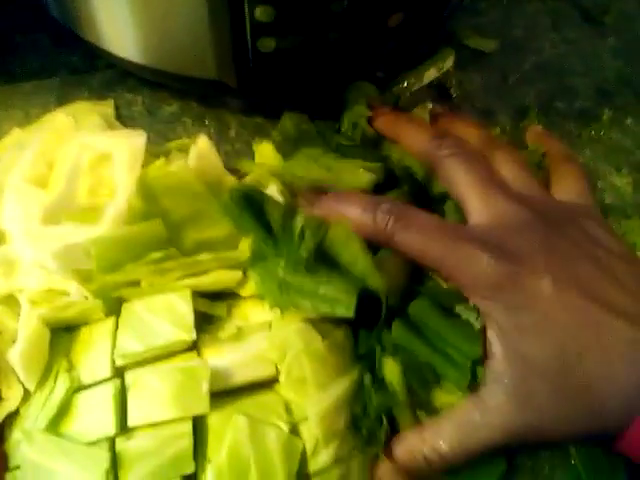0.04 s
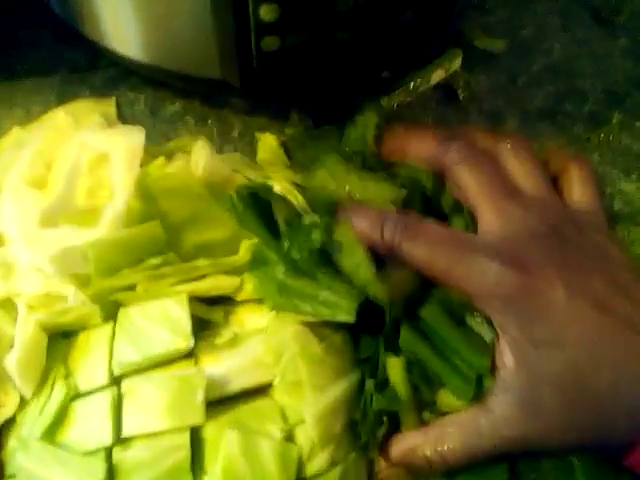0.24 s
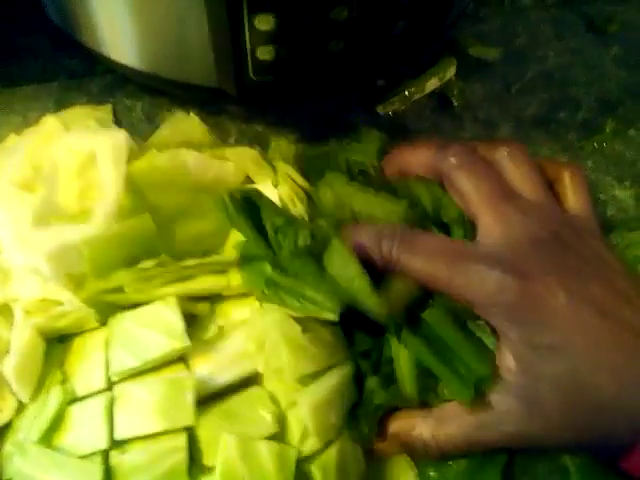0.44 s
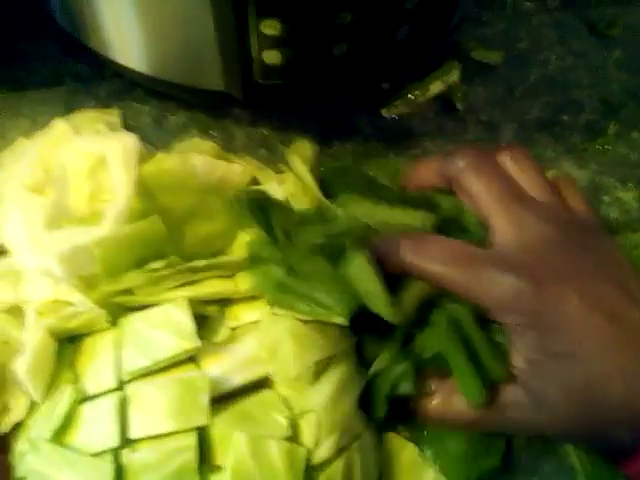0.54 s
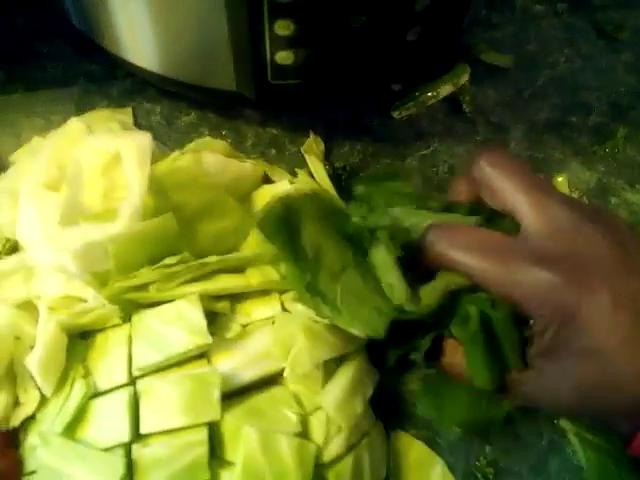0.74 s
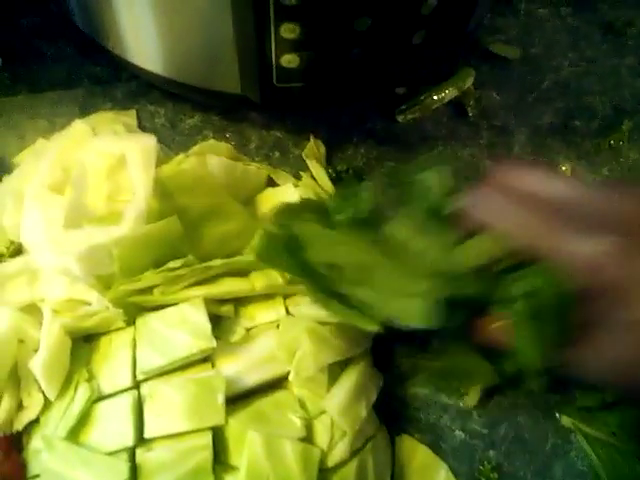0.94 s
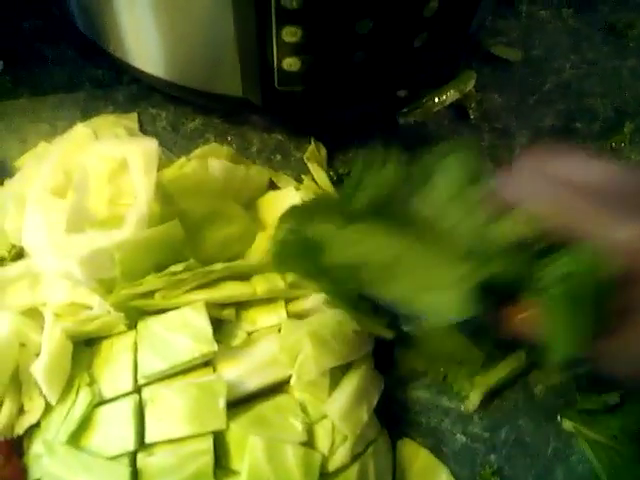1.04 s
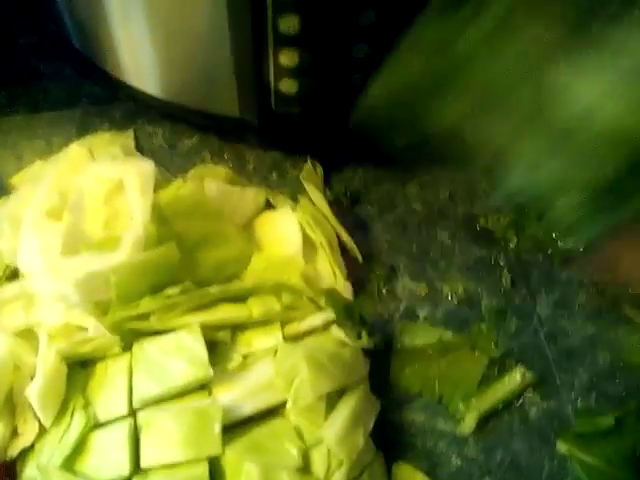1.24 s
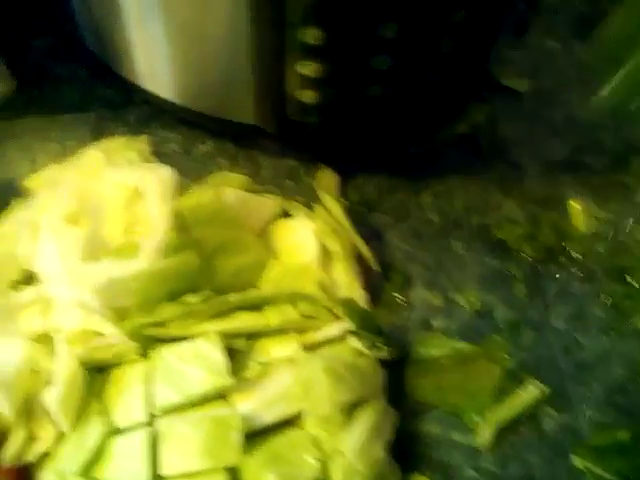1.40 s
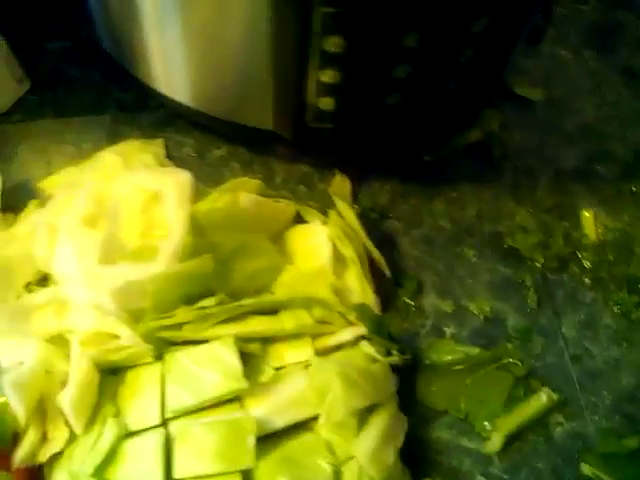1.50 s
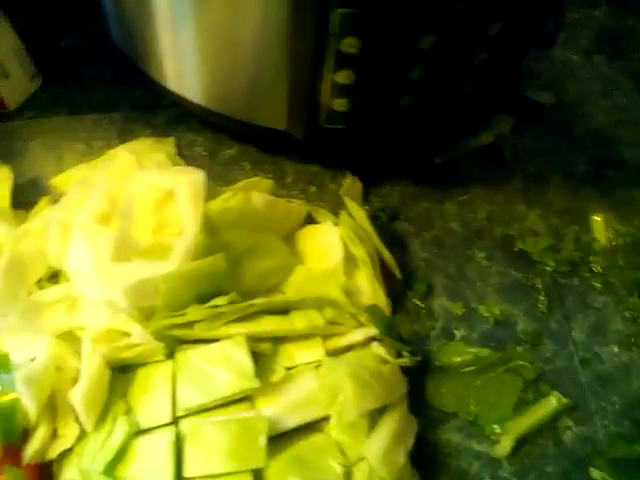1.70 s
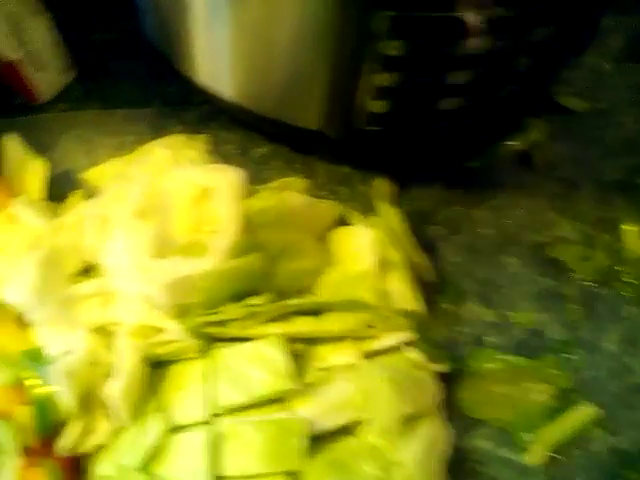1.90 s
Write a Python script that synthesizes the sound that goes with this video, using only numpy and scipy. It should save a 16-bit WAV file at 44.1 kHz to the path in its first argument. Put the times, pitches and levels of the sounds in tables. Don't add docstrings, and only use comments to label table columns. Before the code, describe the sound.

Chopped leafy greens rustle and crunch as a hand gathers and drags them across a worktop

```python
import sys
import numpy as np
from scipy import signal
from scipy.fft import rfft, irfft, next_fast_len
from scipy.io import wavfile
from scipy.ndimage import uniform_filter1d, map_coordinates

SR = 44100
rng = np.random.default_rng(int(sys.argv[2]) if len(sys.argv) > 2 else 0)


def field_ratio(decibels):
    return 10 ** (np.asarray(decibels, dtype=float) / 20)


def file_out(sig):
    cols = np.atleast_2d(sig).T
    lim = np.clip(cols, -1, 1)
    pcm = np.round(lim * 32767).astype(np.int16)
    wavfile.write(sys.argv[1], SR, pcm)


N = 85995


def unit(x):
    return x / np.sqrt(np.mean(x ** 2) + 1e-20)


def along(points, hz):
    f, v = np.transpose(points)
    return np.interp(np.log(hz + 1), np.log(f + 1), v)


def wobble(rate):
    knots = rng.standard_normal(int(N * rate / SR) + 4)
    return map_coordinates(knots, [np.arange(N) * rate / SR])


def filtered(x, response):
    m = next_fast_len(len(x) + 8192)
    return irfft(rfft(x, m) * response(np.fft.rfftfreq(m, 1 / SR)), m)[:len(x)]


def peak(f, hz, width_hz):
    return 1j * f * width_hz / (hz * hz - f * f + 1j * f * width_hz)


def place(out, start_s, sound):
    out[round(start_s * SR):][:len(sound)] += sound


def effort(column):
    # (time [s], rustle level [dB], pressure level [dB])
    hand = [(0, -53, -64.5), (0.059, -56, -63), (0.17, -58, -60.5), (0.185, -50, -63.5),
            (0.259, -50.5, -52), (0.311, -50, -67.5), (0.357, -55, -60), (0.411, -47, -47.5),
            (0.469, -53, -62.5), (0.561, -46, -46.5), (.595, -49, -50.5), (0.667, -45, -62),
            (0.711, -50.5, -50), (.75, -44, -53), (0.899, -41.5, -50.5), (1.05, -40.5, -53),
            (1.192, -43, -53.5), (1.24, -60, -60.5)]
    quiet_db = -61.5
    rows = np.transpose(hand)
    power = field_ratio(np.interp(np.arange(N) / SR, rows[0], rows[column])) ** 2
    return np.sqrt(np.clip(power - field_ratio(quiet_db) ** 2, 0, None))


def grains(count, mid_hz, spread, cycles, scatter_db):
    u, z, t = rng.random((count, 2)), rng.standard_normal(count), np.arange(160) / SR
    hz = np.clip(mid_hz * np.exp(spread * z), 900, 7500)[:, None]
    size_db = -scatter_db * np.log(np.maximum(u[:, 1:], .03))
    rows = field_ratio(size_db) * np.exp(-t * hz / cycles) * np.sin(2 * np.pi * hz * t)
    at = (u[:, :1] * N).astype(int) + np.arange(len(t))
    track = np.bincount(at.ravel(), rows.ravel())[:N]
    return unit(filtered(track, lambda f: f * f / (f * f + 600 ** 2)))


def leaves():
    # (frequency [Hz], density [dB per Hz])
    leaf_color = [(300, -14), (700, -12), (1400, -7), (3200, -7), (6500, -7), (8400, -14.5)]
    rustle_db, grains_db = -.5, -5.5
    z = signal.stft(rng.standard_normal(N), nperseg=256)[2]
    patches = uniform_filter1d(uniform_filter1d(rng.standard_normal(z.shape), 6, 0), 5, 1)
    hiss = signal.istft(z * field_ratio(2.5 * unit(patches)), nperseg=256)[1][:N]
    hiss = unit(filtered(hiss, lambda f: field_ratio(along(leaf_color, f)) * (f > 250)))
    crackle = grains(count=5000, mid_hz=4200, spread=.45, cycles=2.5, scatter_db=3.5)
    clumps = field_ratio(0.34 * wobble(32) + 1.6 * wobble(90))
    return effort(column=1) * clumps * (field_ratio(rustle_db) * hiss + field_ratio(grains_db) * crackle)


def drag():
    # (start time [s], length [s], level [dB], pitch [Hz])
    jerks = [(0.604, 0.028, -50.5, 982), (0.629, .065, -47, 1072), (0.635, 0.075, -53, 490),
             (.95, .06, -55, 499.3), (0.642, 0.028, -49, 888), (0.677, 0.019, -47.5, 858),
             (0.719, 0.03, -46.5, 1101), (0.722, 0.015, -47, 1329), (0.773, 0.018, -45, 1044),
             (0.788, 0.0077, -50.5, 1043), (0.825, 0.025, -49.5, 938), (0.867, 0.032, -51.5, 1082),
             (0.914, .01, -48, 1014), (0.933, 0.038, -46, 1005), (0.979, .026, -43.5, 1010),
             (1.016, 0.012, -41.5, 1013), (1.04, 0.014, -41.5, 1013), (1.069, 0.0099, -43, 1031),
             (1.103, .03, -53.5, 949), (1.105, 0.047, -43, 2217), (1.14, 0.013, -43.5, 933),
             (1.181, 0.01, -48.5, 1028)]
    # (multiple of pitch, width over pitch, level [dB])
    hollow_modes = [(1, 0.13, 0.5), (2.15, 0.065, -5), (3.15, 0.1, -7), (4.4, 0.095, -7)]
    drag_db, press_db = 1.5, -6
    slips_db, sing_db = -5, -1.5
    out, t = np.zeros(N + SR), np.arange(SR // 5) / SR

    def hollow(f, hz):
        modes = enumerate(hollow_modes)
        return sum((-1) ** k * field_ratio(db) * peak(f, m * hz, w * hz) for k, (m, w, db) in modes)

    for start, length, db, hz in jerks:
        shape = (1 - np.exp(-t / 0.0014)) * field_ratio(-60 * np.clip(t - length, 0, None) / 0.034)
        slips = rng.standard_normal(len(t)) * field_ratio(4.4 * rng.standard_normal(len(t)))
        steady_rms = filtered(slips, lambda f: hollow(f, hz)).std()
        scrape = filtered(slips * shape, lambda f: hollow(f, hz)) / steady_rms
        drift = .06 * np.cumsum(rng.standard_normal(len(t)))
        sing = field_ratio(sing_db) * shape * np.sin(2 * np.pi * hz * t + drift)
        place(out, start, field_ratio(db + drag_db) * (field_ratio(slips_db) * scrape + sing))
    uneven = field_ratio(3.6 * wobble(25)) * rng.standard_normal(N)
    rumble = unit(filtered(uneven, lambda f: peak(f, 260, 260) ** 2))
    return out[:N] + field_ratio(press_db) * effort(column=2) * rumble


def crunches():
    # (time [s], peak level [dB], pitch [Hz], decay t60 [s])
    crunch_events = [(.182, -43, 5500, 0.14), (.199, -41, 4480, 0.14), (0.284, -37, 5370, 0.22),
                     (0.303, -33.5, 1480, 0.12), (0.315, -39.5, 4280, 0.075), (0.37, -37.5, 3930, 0.051),
                     (0.393, -33, 4610, 0.11), (.404, -38.5, 5680, 0.068), (0.485, -26, 2980, 0.04),
                     (0.487, -25.5, 5220, 0.099), (0.525, -31.5, 1556, 0.078), (0.532, -33.5, 4760, 0.18),
                     (.547, -25, 6120, 0.18), (0.601, -35, 3860, 0.059), (0.621, -38, 4940, 0.048),
                     (.65, -25.5, 5430, 0.032), (0.661, -27.5, 5390, 0.06), (0.681, -35, 5450, 0.14),
                     (0.721, -24, 5710, 0.13), (0.73, -26, 6500, 0.13), (.815, -32, 3770, 0.12),
                     (0.833, -31, 4930, 0.093), (0.864, -27, 1787, 0.04), (0.88, -34.5, 4600, 0.044),
                     (0.918, -24, 3130, .06), (0.945, -25.5, 3094, 0.089), (0.96, -28.5, 4430, 0.08),
                     (0.983, -17, 6400, 0.027), (1.0, -37.5, 4480, 0.063), (1.021, -32.5, 3940, .04),
                     (1.042, -25, 3194, .07), (1.05, -27.5, 6460, .05), (1.073, -24, 5360, 0.037),
                     (1.101, -30.5, 3250, 0.14), (1.124, -27, 4030, 0.079), (1.141, -29, 4380, 0.086),
                     (1.19, -29, 3240, 0.07), (1.225, -42, 4520, .2), (1.26, -45, 5520, .15),
                     (1.283, -45, 5490, .1), (1.548, -47.5, 3630, .08)]
    snap_db = 0.5
    out, t = np.zeros(N + SR), np.arange(SR // 5) / SR
    for start, db, hz, t60 in crunch_events:
        sparse = rng.random(len(t)) < .15
        ticks = rng.standard_normal(len(t)) * sparse * field_ratio(1.3 * wobble(300)[:len(t)])
        ticks = unit(ticks) * field_ratio(-60 * t / max(t60, .005)) * (1 - np.exp(-t / .0004))
        burst = filtered(ticks, lambda f: peak(f, hz, 0.11 * hz) + field_ratio(-8.0) * peak(f, 3000, 6100) ** 2)
        place(out, start, field_ratio(db + snap_db) * burst / np.abs(burst).max())
    return out[:N]


def cracks():
    # (time [s], peak level [dB], pitch [Hz], width over pitch)
    stalks = [(0.2, -34.5, 5720, 0.47), (.2855, -36.5, 5500, 0.35), (0.3024, -40, 1430, 0.51),
              (0.305, -40.5, 5500, .4), (.318, -36.5, 3050, 0.59), (0.368, -35, 1470, 0.87),
              (.37, -38, 6160, 0.37), (0.378, -39, 4630, 0.42), (0.3953, -30, 1870, 1.4),
              (0.3962, -30.5, 5440, .6), (0.4045, -32, 5290, 0.51), (0.404, -38, 2800, 0.23),
              (.465, -45.5, 6020, 0.24), (0.4845, -28, 3000, 1), (0.51, -39, 2680, 0.56),
              (0.528, -32, 1560, 0.54), (0.5461, -17.5, 6000, 0.47), (.548, -18, 6410, 0.42),
              (.554, -25, 6320, 0.38), (0.563, -36.5, 6370, 0.077), (0.577, -28, 5220, 0.18),
              (.603, -34, 2290, 0.55), (.623, -31.5, 4660, 0.098), (.651, -32, 5650, 0.34),
              (0.662, -23.5, 2120, 2.3), (.684, -37, 5380, 0.22), (0.7294, -18.5, 6340, 0.2),
              (0.7366, -27, 6290, .3)]
    # (time [s], peak level [dB], pitch [Hz], width over pitch)
    scraps = [(1.266, -50, 3550, .3), (1.277, -47.5, 2970, 0.53), (1.2884, -40.5, 6100, 0.26),
              (1.286, -40.5, 1810, 0.19), (1.333, -52, 5880, 0.37), (1.3545, -43, 5860, 0.38),
              (1.357, -54.5, 5900, .3), (1.367, -42.5, 3530, .5), (1.376, -49.5, 3560, 0.2),
              (1.538, -52, 4140, 0.29), (1.549, -44.5, 3090, 0.61), (1.551, -50, 4510, 0.27),
              (1.558, -56, 2970, .2)]
    # (time [s], peak level [dB], pitch [Hz])
    ribs = [(0.78, -37.5, 2740), (0.7948, -35, 2760.0), (0.8098, -38, 6120.0), (0.8166, -33.5, 5080.0),
            (0.8233, -34.5, 3950), (0.8344, -29.0, 4740.0), (0.846, -30.5, 4740.0), (0.8514, -36, 5280),
            (0.867, -32, 2840.0), (0.8816, -31.0, 4650.0), (0.9161, -32.5, 5340.0), (0.9358, -29, 3010.0),
            (0.9449, -19.5, 4740.0), (0.9488, -25, 2334), (0.9643, -29.5, 4220.0), (0.9719, -30, 4820.0),
            (0.9852, -29.5, 6290.0), (0.9893, -25, 6030.0), (1.004, -34.5, 5080.0), (1.0204, -30.5, 4650.0),
            (1.0253, -35.5, 2150.0), (1.0438, -27, 4700), (1.0481, -24.5, 3190.0), (1.0559, -29.0, 4570.0),
            (1.074, -28, 5570), (1.0779, -30, 4680), (1.1073, -33.5, 3170), (1.1118, -32.0, 4520),
            (1.1262, -28, 1570), (1.13, -34, 2150.0), (1.1425, -31, 4760), (1.147, -31, 3520),
            (1.1533, -32, 3140), (1.1673, -31.5, 5170.0), (1.189, -28.0, 4740.0), (1.193, -30, 3110)]
    rib_db, rib_width = 2, .3
    crack_db, broad_db = 1.5, -9
    out, t = np.zeros(N + SR), np.arange(SR // 5) / SR
    rib_cracks = [(start, db + rib_db, hz, rib_width) for start, db, hz in ribs]
    for start, db, hz, width in list(stalks) + list(scraps) + rib_cracks:
        kick = rng.standard_normal(len(t)) * field_ratio(-60 * t / .009)
        crack = filtered(kick, lambda f: peak(f, hz, width * hz) ** 2 + field_ratio(broad_db) * peak(f, 3200, 5600))
        place(out, start, field_ratio(db + crack_db) * crack / np.abs(crack).max())
    return out[:N]


def bumps():
    # (time [s], peak level [dB])
    taps = [
        (0.368, -53.5),
        (0.394, -42),
        (0.54, -41),
        (0.728, -41),
        (0.961, -48.5),
    ]
    bump_db = -6.5
    out, t = np.zeros(N + SR), np.arange(SR // 5) / SR
    tones = np.sin(2 * np.pi * 205 * t) + 1.1 * np.sin(2 * np.pi * 310 * t)
    for start, db in taps:
        place(out, start, field_ratio(db + bump_db - 60 * t / 0.19) * (1 - np.exp(-t / 0.001)) * tones)
    return out[:N]


def thumps():
    # (time [s], peak level [dB], pitch [Hz])
    palm = [
        (.4, -60, 98.7),
        (0.702, -57.5, 116.7),
        (0.741, -58.5, 106.3),
        (.86, -60.5, 102),
        (0.907, -60, 101.7),
        (0.999, -64, 102),
    ]
    out, t = np.zeros(N + SR), np.arange(SR // 5) / SR
    for start, db, hz in palm:
        swell = 1 - np.exp(-t / .012)
        place(out, start, field_ratio(db + 8 - 60 * t / 0.24) * swell * np.sin(2 * np.pi * hz * t))
    return out[:N]


def walls(x):
    # (frequency [Hz], decay t60 [s])
    decay = [(200, 0.33), (2000, 0.3), (7000, 0.15)]
    hz, t, z = signal.stft(rng.standard_normal(SR // 2), SR, nperseg=256)
    tail = signal.istft(z * field_ratio(-60 * t / along(decay, hz)[:, None]), SR, nperseg=256)[1]
    delayed = np.pad(x, (150, 0))
    return signal.fftconvolve(delayed, tail / np.linalg.norm(tail))[:N]


def kitchen():
    # (frequency [Hz], density [dB per Hz])
    room_color = [(30, -18.5), (110, -11.5), (200, -8), (330, -4.5), (480, -10.5), (1000, -14), (2500, -24),
                  (7000, -44)]
    # (frequency [Hz], rms level [dB])
    drone_lines = [(252, -68.5), (295, -76.5), (354, -63.5), (540, -71.5), (952, -77)]
    room_db = -58
    t = np.arange(N) / SR
    sound = field_ratio(room_db) * unit(filtered(rng.standard_normal(N), lambda f: field_ratio(along(room_color, f))))
    for hz, db in drone_lines:
        level = field_ratio(db + 1.5 + 1.8 * wobble(12))
        sound = sound + level * np.sin(2 * np.pi * hz * t + .6 * wobble(14))
    return sound


def scene():
    bright_db, wet_db = 3, -12.5
    near = leaves() + drag() + crunches() + cracks() + bumps() + thumps()
    near = filtered(near, lambda f: field_ratio(bright_db * np.log2(np.maximum(f / 1500, 1))))
    return (near + field_ratio(wet_db) * walls(near) + kitchen())[None]


def low_pass(x):
    return signal.sosfilt(signal.butter(12, 8330, fs=SR, output="sos"), x)


def record(dry):
    # (frequency [Hz], gain [dB])
    roll_off = [(1000, 0), (2200, -4), (5000, -6.5), (6000, -7), (6700, -11), (7500, -16), (8000, -25),
                (8500, -47)]
    hiss_db = -68.5
    step, offset = .0035, -.0007
    hiss = field_ratio(hiss_db) * unit(filtered(rng.standard_normal(N), lambda f: peak(f, 1200, 2500)))
    slow = signal.resample_poly(dry[0] + hiss, up=160, down=441)
    steps = (np.floor(slow / step) + .5) * step
    fast = signal.resample_poly(steps, up=441, down=160)[:N]
    fast = np.pad(fast, (0, N - len(fast)))
    fast = filtered(fast, lambda f: field_ratio(along(roll_off, f)) * f / (f + 25)) + offset
    mix = fast[None] + field_ratio(-97) * rng.standard_normal((1, N))
    return low_pass(mix)


dry = scene()
out = record(dry)
file_out(out)
```